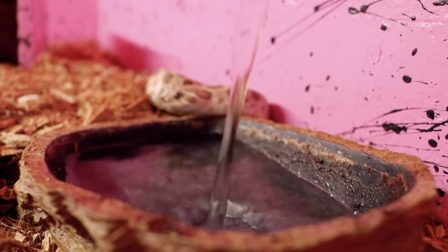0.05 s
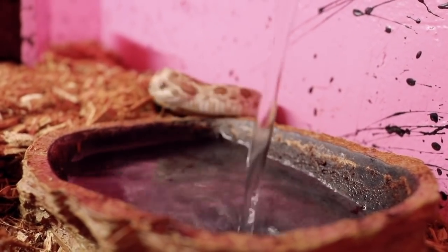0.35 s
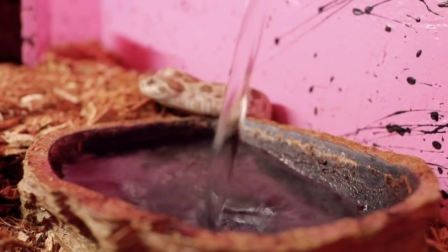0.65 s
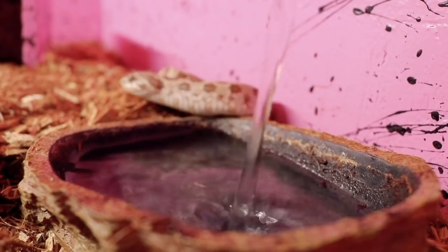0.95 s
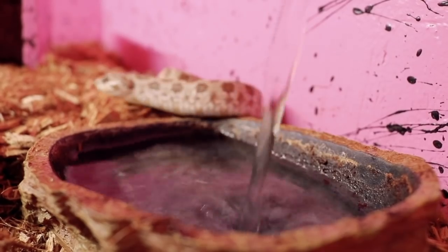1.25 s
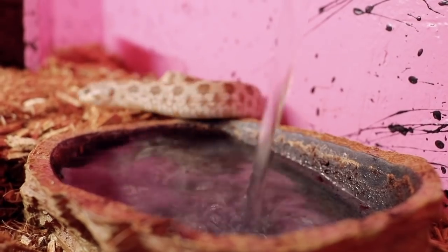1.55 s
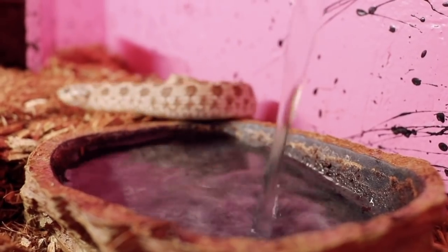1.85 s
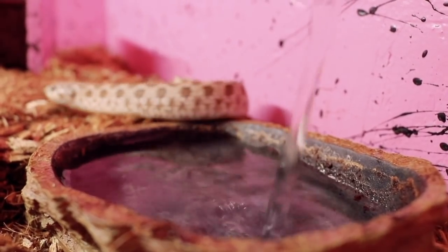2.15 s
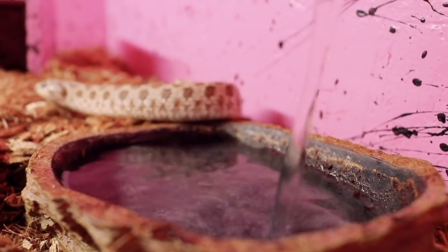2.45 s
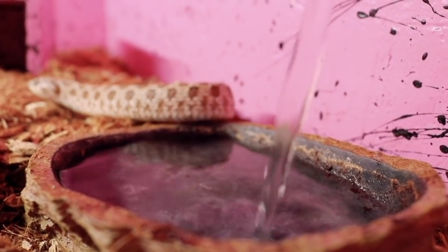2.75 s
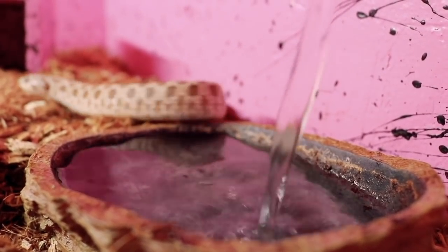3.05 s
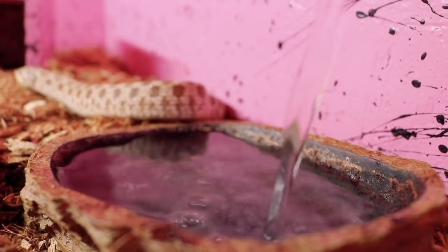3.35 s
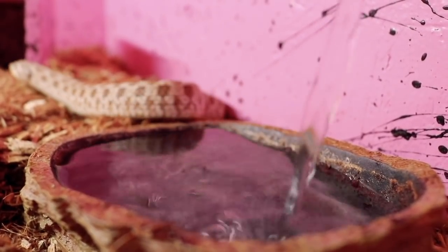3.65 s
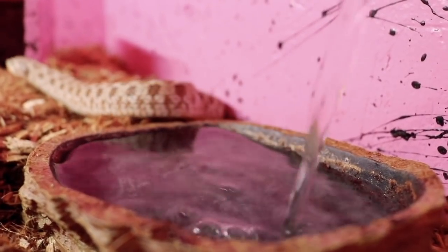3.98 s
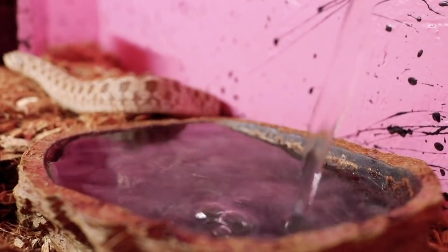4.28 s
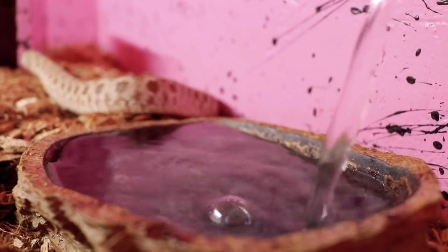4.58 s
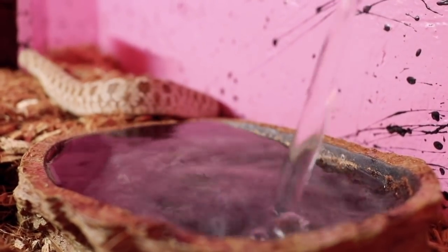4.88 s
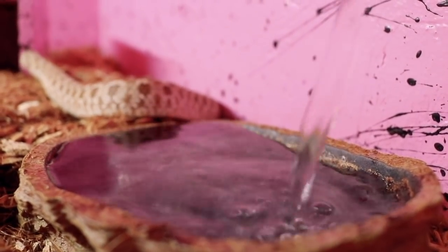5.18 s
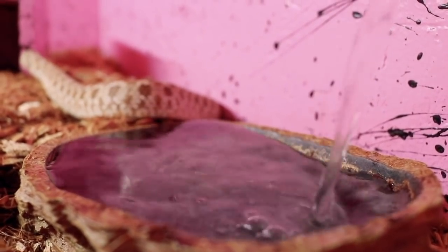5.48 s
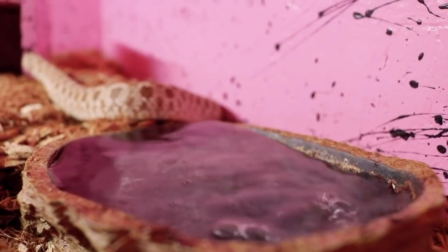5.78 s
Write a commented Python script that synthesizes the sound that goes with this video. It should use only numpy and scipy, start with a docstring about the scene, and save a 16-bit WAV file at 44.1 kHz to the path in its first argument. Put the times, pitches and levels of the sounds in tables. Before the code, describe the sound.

Water pours gently from a plastic bottle into a bowl, burbling and spattering in a quiet room, the bottle snapping once.

```python
"""A faint gurgle over the low hum of a quiet room: a thin stream of water is being poured from a
plastic bottle into a shallow bowl inside a small tank. A swarm of tiny bubbles swells with the flow,
drops slap the surface, and the bottle flexes with dull pops and one sharp snap. Pockets of trapped
air ring out as clear plinks. The near walls throw everything back within milliseconds."""
import sys
import numpy as np
from scipy import signal
from scipy.fft import rfft, irfft, next_fast_len
from scipy.io import wavfile
from scipy.ndimage import uniform_filter1d

SR = 44100
rng = np.random.default_rng(int(sys.argv[2]) if len(sys.argv) > 2 else 0)


def unload_wav(signal):
    """Save mono or channel-first audio to the path in sys.argv[1] as 16-bit WAV at rate SR, clipped to [-1, 1]."""
    wavfile.write(
        sys.argv[1],
        SR,
        np.round(np.clip(np.atleast_2d(signal).T, -1, 1) * 32767).astype(np.int16),
    )


N = 256838


def gain_of(db):
    """Decibels to a factor."""
    return 10 ** (np.asarray(db) / 20)


def unit_rms(x):
    """Scales to rms 1."""
    return x / np.sqrt(np.mean(x ** 2) + 1e-20)


def decay(t, t60, hold=1):
    """A fade that is 60 dB down at t60; a hold above 1 lingers first, then dies faster."""
    return np.exp(-np.log(1000) * (t / t60) ** hold)


def curve_at(points, hz):
    """Reads a curve on a log-frequency axis."""
    f, value = np.transpose(points)
    return np.interp(np.log(hz + 1), np.log(f + 1), value)


def stereo_pair(a, b, likeness):
    """Blends two independent noises into left and right with the given correlation."""
    return np.array([a, likeness * a + np.sqrt(1 - likeness ** 2) * b])


def place(mix, s, sound, pan_db=0):
    """Drops a sound into the mix at time s; positive pan leans left."""
    part = mix[:, max(round(s * SR), 0):][:, :len(sound)]
    part += gain_of([[pan_db / 2], [-pan_db / 2]]) * sound[:part.shape[1]]


# Colour of the room tone: f/Hz, relative level/dB
ROOM_COLOUR = [(20, -50), (40, 0.5), (62, 0.5), (120, -1), (270, 0.5), (500, -1.5), (1000, -6.5),
               (1900, -7.5), (2200, -17.5), (4000, -14.5), (7000, -15.5), (10000, -18.5), (13500, -23.5),
               (16000, -23)]
# Stereo image of the room tone: f/Hz, left-right correlation
ROOM_LIKENESS = [(40, 0.78), (120, 0.4), (500, 0.56), (2000, 0.017), (8000, 0.062)]


def room_tone(air_db=-61, hum_db=-76.5, hum_hz=89.8):
    """A bed of soft room noise with a wavering hum."""
    hz = np.fft.rfftfreq(N, 1 / SR)
    a, b, c = rfft(rng.standard_normal((3, N)))
    spectrum = stereo_pair(a, b, curve_at(ROOM_LIKENESS, hz))
    air = irfft(spectrum * gain_of(curve_at(ROOM_COLOUR, hz)), N)
    hum = irfft(c / (1 + ((hz - hum_hz) / 3) ** 2), N)  # noise a few hertz wide
    return gain_of(air_db) * unit_rms(air) + gain_of(hum_db) * unit_rms(hum)


def bubble(hz, t60, rise=0.093, attack_cycles=0.5):
    """A pocket of air swells into a ring, its pitch climbing as it nears the surface."""
    t = np.arange(int(max(t60, 0.002) * SR)) / SR
    cycles = hz * (t + rise * t ** 2 / t60 / 2)
    attack = 1 - np.exp(-cycles / attack_cycles)
    return np.sin(2 * np.pi * cycles) * attack * decay(t, t60, hold=1.43)


# Swells as the stream drags air under: t/s, large bubbles/dB, small bubbles/dB, fine spray/dB
FLOW_SWELLS = [(0, -57.5, -64.5, -93), (.17, -67, -75.5, -90), (.3, -83, -75, -90), (.65, -82, -71, -82),
               (0.869, -82, -68, -61.5), (1.11, -87, -75, -84), (1.17, -81, -58.5, -61),
               (1.31, -88, -56, -62.5), (1.355, -88, -67, -65.5), (1.45, -90, -60, -58.5),
               (1.6, -91, -51, -58), (1.74, -86, -61, -58), (1.899, -66, -55.5, -63.5),
               (2.07, -60, -58, -61.5), (2.3, -57.5, -57.5, -64), (2.62, -63, -56.5, -64),
               (2.789, -83, -64, -65), (2.91, -53, -54, -63.5), (3.0, -71, -61, -64.5),
               (3.06, -76, -54.5, -60), (3.16, -65, -57, -59.5), (3.24, -66, -57.5, -65),
               (3.37, -61, -53, -59.5), (3.53, -59.5, -61.5, -62), (3.76, -64, -58.5, -64.5),
               (4.06, -99, -75, -65), (4.22, -96, -63, -60), (4.3, -65, -64.5, -64), (4.4, -55, -55.5, -62),
               (4.55, -59, -66, -65), (4.74, -53.5, -51, -62), (4.85, -67, -65, -74),
               (4.95, -50.5, -52.5, -68), (5.2, -52, -51, -70), (5.301, -51.5, -53, -66.5),
               (5.58, -55, -55, -63), (5.72, -62, -58, -62.5), (5.82, -62, -54, -56)]
# The steady ring where the stream plunges in: t/s, level/dB
PLUNGE_SWELLS = [(0, -67.5), (.18, -68), (.3, -81), (.65, -80), (1.1, -85), (1.6, -84), (1.85, -60),
                 (2.3, -62.5), (2.6, -65.5), (2.799, -92), (3.0, -68), (3.7, -67.5), (3.85, -78),
                 (4.05, -90), (4.3, -78), (4.5, -64.5), (4.801, -73), (5.3, -67.5), (5.82, -73)]
# The dense burble of the fullest pour: t/s, level/dB
BURBLE_SWELLS = [(4.88, -90), (4.94, -60), (5.09, -61), (5.125, -65), (5.19, -55.5), (5.26, -61),
                 (5.29, -68), (5.33, -61), (5.55, -57), (5.62, -72), (5.82, -66)]


def swarm(flow, low_hz, high_hz, per_s, cycles, level_db, spread_db):
    """Many faint bubbles of one size range, with the flow riding their fader."""
    out = np.zeros((2, N))
    for when, pitch, strength, side, ring in rng.random((int(per_s * N / SR), 5)):
        hz = low_hz * (high_hz / low_hz) ** pitch
        blip = gain_of(spread_db * strength ** 2) * bubble(hz, cycles * (0.5 + ring) / hz)
        place(out, when * N / SR, blip, 10 * (side - 0.5))
    power = uniform_filter1d(uniform_filter1d((out ** 2).mean(0), SR // 16), SR // 25)
    levelled = out / np.sqrt(abs(power) + 1e-6)
    return levelled * gain_of(level_db + np.interp(np.arange(N) / SR, *flow))


def surges(depth_db=0.9, span_s=0.037):
    """The stream wobbles: a gain that swells and thins the froth at random."""
    span = int(span_s * SR)
    wobble = uniform_filter1d(uniform_filter1d(rng.standard_normal(N), span), span)
    return gain_of(depth_db * unit_rms(wobble))


def strays(flow, low_hz, high_hz, per_s, level_db, spread_db):
    """Single bubbles poke out of the swarm at random, louder as the flow swells."""
    out = np.zeros((2, N))
    for k, (when, pitch, strength, side) in enumerate(rng.random((int(per_s * N / SR), 4))):
        s = (k + when) / per_s
        hz = low_hz * (high_hz / low_hz) ** pitch
        db = np.interp(s, *flow) + level_db - spread_db * strength
        cycles = 31 * (3000 / max(hz, 1500)) ** 0.14  # large bubbles ring a few cycles more
        place(out, s, gain_of(db) * bubble(hz, cycles / hz), 10 * (side - 0.5))
    return out


# Drops slapping the water: t/s, level/dB, brightest f/Hz, width as a share of f, t60/s
DROP_SLAPS = [(0.2356, -47, 7700, 0.18, 0.0042), (0.345, -41.5, 5430, 0.21, 0.0043),
              (.437, -44, 7000, 0.33, 0.0027), (.588, -51, 7400, .1, .008),
              (0.66, -46.5, 10800, .08, 0.0076), (.6823, -37, 6000, 0.62, 0.0093),
              (0.714, -43, 7340, .12, .005), (0.8686, -34.5, 6540, 0.34, 0.0037),
              (1.0338, -44, 5670, 0.22, 0.003), (1.146, -44, 6800, 0.14, .005),
              (1.163, -45, 6570, .2, 0.0041), (1.192, -47, 8000, .4, 0.0076), (1.217, -43, 5000, .6, .009),
              (1.268, -41, 8500, .3, .014), (1.288, -39, 9000, .3, .007), (1.3044, -40, 7550, 0.5, 0.016),
              (1.321, -39, 10500, .25, .01), (1.3797, -48, 5440, .3, .008), (1.4341, -48, 4750, 0.23, .006),
              (1.441, -45, 5000, 0.54, .008), (1.4576, -42, 5800, .5, .008), (1.489, -45, 3560, .4, 0.0073),
              (1.5015, -40, 5500, 0.66, .005), (1.539, -44, 10000, .3, .005),
              (1.586, -46, 6000, .5, 0.0064), (1.614, -42, 4000, .45, .009), (1.6187, -43, 4600, .45, .007),
              (1.668, -37, 5000, 0.46, 0.007), (1.684, -44, 9500, 0.28, 0.013),
              (1.696, -40, 7500, 0.18, .005), (1.746, -41, 3050, .2, 0.0097),
              (1.7595, -39, 2900, .25, .008), (1.7605, -50, 11300, .13, 0.0069),
              (1.807, -40, 3700, .3, .01), (1.8137, -41, 5570, 0.57, .006), (1.8767, -37, 3800, .5, .005),
              (1.893, -39, 3200, .4, .007), (1.914, -39.5, 6500, 0.21, 0.0084),
              (2.0185, -31.5, 9900, 0.21, 0.0057), (2.1645, -38.5, 5000, 0.39, 0.0064),
              (2.233, -50, 6500, 0.29, .01), (2.245, -42.5, 6450, 0.19, .006),
              (2.3133, -45, 5960, 0.28, .008), (2.387, -45, 6900, .15, .006),
              (2.456, -47, 12500, .12, .005), (2.671, -47, 4880, .35, 0.0045),
              (2.78, -44, 9100, 0.43, 0.0051), (2.821, -41.5, 7000, 0.68, 0.0034),
              (2.8516, -42.5, 5050, .3, .015), (2.9655, -49, 11000, .25, .008),
              (3.0128, -44, 5500, 0.39, .004), (3.188, -39, 12850, 0.14, 0.0037),
              (3.195, -41, 12900, 0.11, 0.0056), (3.2483, -40.5, 4880, .2, .006),
              (3.5318, -41, 5400, .3, 0.0036), (3.684, -46.5, 8000, 0.4, 0.0053),
              (3.7142, -45, 8000, .45, 0.0055), (3.759, -45, 6450, .2, 0.0057),
              (3.9211, -40, 7460, .15, 0.0046), (3.979, -38, 3200, 0.28, 0.0092),
              (4.091, -42, 3500, 0.27, 0.0089), (4.3876, -28.5, 12900, 0.12, 0.0036),
              (4.388, -34.5, 4400, 0.89, .004), (4.7723, -36, 7200, 0.35, 0.0035),
              (4.778, -22, 12400, 0.13, 0.0055), (4.7785, -39, 4800, .8, 0.038),
              (4.9275, -38, 2950, 0.42, 0.0087), (4.9728, -39, 2400, .45, .007),
              (5.0678, -38, 3030, .35, .01), (5.1448, -41, 2900, .5, .007), (5.1814, -41, 2300, 0.61, .012),
              (5.2055, -38, 3000, .35, 0.0031), (5.302, -47, 3120, .4, 0.0053),
              (5.391, -42, 2480, .3, .007), (5.6367, -38, 3900, 0.13, 0.0056),
              (5.6567, -38.5, 5500, 0.94, 0.0021), (5.747, -33.5, 4800, 0.4, 0.01),
              (5.7533, -26.5, 3770, 0.14, 0.0029), (5.7543, -29.5, 10400, 0.25, 0.0076),
              (5.794, -33, 9900, 0.036, 0.011), (5.797, -35, 11500, 0.29, 0.007)]


def slaps(level_db=-1, splash_db=-20, attack_s=0.00042, soft_hz=9000):
    """A drop hits the surface: a short burst of spray around one bright tone."""
    out = np.zeros((2, N))
    t = np.arange(2048) / SR
    hz = np.fft.rfftfreq(len(t), 1 / SR)
    splash = gain_of(splash_db) * hz / (hz + 1200) / (1 + (hz / soft_hz) ** 2)
    attack = 1 - np.exp(-t / attack_s)
    for s, db, peak_hz, width, t60 in DROP_SLAPS:
        colour = np.exp(-(np.log((hz + 1) / peak_hz) / width) ** 2) + splash
        burst = irfft(rfft(rng.standard_normal(len(t))) * colour) * attack * decay(t, t60)
        place(out, s, gain_of(db + level_db) * burst / abs(burst).max())
    return out


def bumps(events, release_s, depth):
    """A gain that jumps at each event, more for loud ones, and settles back to 1."""
    kicks = np.zeros(N)
    for s, db, *_ in events:
        kicks[int(s * SR)] += gain_of(db / 2)
    envelope = signal.lfilter([1], [1, -np.exp(-1 / (release_s * SR))], kicks)
    return 1 + depth * envelope / kicks.max()


def spatter():
    """Each slap throws up fine droplets that patter back at once: a brief lift for the mist."""
    return bumps(DROP_SLAPS, release_s=0.011, depth=2.8)


# Modes of the plastic wall: f/Hz, level/dB, t60/s
WALL_MODES = [(160, -1.5, 0.016), (362, -3, 0.024), (454, -2, 0.03), (676, 1, 0.026), (864, 7.5, 0.012),
              (1167, 11, 0.012), (1430, -4.5, 0.01), (1520, -34, 0.018), (2180, 12, 0.0091),
              (2750, 11.5, 0.0076), (3520, 15.5, 0.0028), (4440, 11.5, 0.0073), (5900, 18.5, 0.0016)]
# Pops of the flexing bottle: t/s, level/dB, brightness corner/Hz, lowest tone/Hz,
# hollow level/dB, hollow f/Hz, hollow t60/s, pan/dB
BOTTLE_POPS = [(0.2632, -38.5, 520, 173, -54.5, 265.6, 0.17, 0),
               (0.2644, -47, 2600, 900, -54, 318, 0.056, 0), (.269, -43.5, 1150, 330, -51, 424, 0.07, 0),
               (.393, -63, 302, 298, -47, 260, 0.053, -2), (1.917, -41, 746, 140, -46, 176, 0.058, 5),
               (1.925, -38, 654, 169, -48.5, 243, .055, 1),
               (2.0176, -12.5, 6200, 490, -31.5, 273, 0.051, -6),
               (3.4322, -42, 494, 383, -60, 253, .055, 4), (4.31, -34, 766, 166, -62, 233, 0.043, -3),
               (4.3139, -40, 730, 265, -46, 760, 0.067, -2), (5.634, -51, 252, 133, -52, 258, 0.067, 0),
               (5.757, -52, 300, 130, -52, 217, 0.052, 0)]


def bottle_pops():
    """The thin wall snaps through, and the air inside answers with a hollow ring."""
    out = np.zeros((2, N))
    t = np.arange(SR // 5) / SR
    for s, db, corner_hz, low_hz, hollow_db, hollow_hz, hollow_t60, pan_db in BOTTLE_POPS:
        pop = np.zeros(len(t))
        for k, (hz, mode_db, t60) in enumerate(WALL_MODES):
            push = (-1) ** k / np.sqrt(1 + (hz / corner_hz) ** 6)  # neighbours swing opposite ways
            pop += push * gain_of(mode_db) * np.sin(2 * np.pi * hz * t) * decay(t, t60)
        pop = signal.lfilter(*signal.butter(3, low_hz * 0.7, "high", fs=SR), pop)
        place(out, s, gain_of(db) * pop / abs(pop).max(), pan_db)
        hollow = bubble(hollow_hz, hollow_t60, rise=0.1, attack_cycles=1.5)
        place(out, s, gain_of(hollow_db) * hollow)
    return out


def tick(noise, hz, t60=0.0033):
    """The crisp crack of the surface closing: a brief wide burst around the bubble's pitch."""
    burst = noise * decay(np.arange(len(noise)) / SR, t60)
    burst = signal.lfilter(*signal.butter(4, [0.54 * hz, 1.48 * hz], "band", fs=SR), burst)
    return burst / abs(burst).max()


# The foreground bubbles: t/s, f/Hz, level/dB, t60/s, pan/dB
CLEAR_BUBBLES = [(0.287, 5900, -47.5, 0.0066, -1), (0.3122, 4280, -46, 0.0082, -4),
                 (0.3147, 2400, -47.5, 0.016, -6), (0.437, 6080, -42, 0.0052, -1),
                 (0.7153, 7210, -44, 0.003, -7), (0.7513, 6370, -41.5, 0.0059, -9),
                 (0.8248, 3025, -42, 0.013, -7), (0.8294, 6270, -41.5, 0.006, -8),
                 (0.8364, 2670, -44, 0.0058, -11), (0.8666, 2520, -53, 0.019, -9),
                 (0.879, 3170, -42, 0.0046, -9), (0.8789, 7800, -47, 0.006, -9),
                 (0.9244, 5200, -45.5, 0.0068, 10), (0.9552, 4140, -46.0, 0.013, -2),
                 (0.9552, 6400, -46, 0.0049, -13), (1.0343, 6220, -48, 0.007, -1),
                 (1.0373, 3780, -36.5, 0.0054, -6), (1.1521, 2230, -34.5, 0.0097, -4),
                 (1.1552, 6460, -42, 0.0044, 5), (1.166, 3310, -39.5, 0.011, -12),
                 (1.1664, 2300, -41.5, 0.011, -5), (1.1719, 2060, -39, 0.015, -4),
                 (1.1719, 6300, -42, 0.004, 1), (1.222, 2290, -42, 0.012, -4),
                 (1.224, 2900, -42, 0.0078, -6), (1.2475, 2376, -37.5, 0.017, -4),
                 (1.272, 7800, -38, 0.0071, 7), (1.2712, 6680, -33, 0.0071, -4),
                 (1.281, 3110, -41.5, 0.015, -7), (1.3063, 5710, -42.5, 0.0037, 11),
                 (1.32, 3280, -44, 0.011, -8), (1.3971, 1960, -44, 0.018, -5),
                 (1.4158, 2300, -39.5, 0.016, -3), (1.4162, 3200, -37, 0.0043, -6),
                 (1.4172, 1980, -41, 0.02, -5), (1.458, 4540, -44, 0.008, -1),
                 (1.5004, 2380, -37.5, 0.0061, -5), (1.502, 5470, -51, 0.003, -4),
                 (1.535, 2430, -35.5, 0.0085, -4), (1.5476, 2980, -40.5, 0.009, -9),
                 (1.5712, 3420, -38.5, 0.0056, -9), (1.5708, 1915, -43.5, 0.037, -6),
                 (1.587, 6500, -35, 0.0022, -1), (1.599, 4780, -35, 0.0035, 3),
                 (1.6177, 5070, -41.5, 0.01, 5), (1.658, 6720, -44, 0.0081, -9),
                 (1.6688, 3610, -40, 0.0035, -9), (1.669, 4300, -32.5, 0.005, -3),
                 (1.67, 1800, -44, 0.011, -8), (1.67, 5450, -42, 0.009, 15),
                 (1.7054, 3560, -38.5, 0.0057, -5), (1.768, 4400, -40, 0.0091, -1),
                 (1.776, 7100, -38.5, 0.0094, -3), (1.779, 5900, -53, 0.006, 3),
                 (1.8141, 5640, -45, 0.005, 10), (1.8145, 2970, -38, 0.0079, -6),
                 (1.844, 8000, -37, 0.006, -7), (1.854, 7800, -34.5, 0.0074, -2),
                 (1.8676, 5640, -40, 0.0066, 8), (1.8761, 1847, -42.5, 0.027, -5),
                 (1.8761, 3000, -34.5, 0.0046, -5), (1.887, 3360, -39, 0.0067, -4),
                 (1.888, 1860, -45, 0.013, 1), (1.9232, 3030, -32.5, 0.005, -4),
                 (1.9244, 2460, -35, 0.0054, -4), (1.928, 1670, -43, 0.035, -3),
                 (1.9708, 3420, -40, 0.011, -7), (1.975, 1860, -41, 0.015, -5),
                 (2.0638, 1200, -41.5, 0.01, 9), (2.0775, 1680, -40, 0.018, 2),
                 (2.166, 5200, -36, 0.0028, 8), (2.181, 4010, -41.5, 0.011, -1),
                 (2.3566, 2660, -32, 0.0066, -2), (2.357, 1955, -37.0, 0.02, -5),
                 (2.4, 5180, -37, 0.0091, 2), (2.449, 3610, -38.5, 0.01, -2),
                 (2.4488, 2860, -35.5, 0.013, -2), (2.622, 2390, -43, 0.016, 0),
                 (2.621, 4700, -43, 0.012, -6), (2.642, 3150, -41.5, 0.012, -7),
                 (2.671, 3160, -33.5, 0.0039, -3), (2.671, 4860, -38.5, 0.004, 7),
                 (2.6913, 2370, -41.5, 0.013, -4), (2.701, 2900, -34.5, 0.0075, -4),
                 (2.7129, 1846, -40, 0.026, -4), (2.714, 4330, -40, 0.0033, 5),
                 (2.716, 6600, -42.5, 0.0052, -13), (2.7155, 3480, -27, 0.016, -3),
                 (2.732, 3300, -46, 0.008, -2), (2.8025, 3940, -39.5, 0.018, 4),
                 (2.8037, 3270, -40.5, 0.013, -9), (2.8202, 2890, -26.5, 0.0089, -4.5),
                 (2.8601, 950, -49.5, 0.067, -1), (2.8766, 4530, -43, 0.0073, 1),
                 (2.8959, 1080, -44.5, 0.023, -7), (2.8977, 2450, -45, 0.028, -8),
                 (2.908, 1386, -36, 0.023, -5), (2.9096, 2630, -32, 0.01, -6),
                 (2.9137, 1164, -54, 0.02, -4), (2.934, 1625, -40.5, 0.034, -6),
                 (2.935, 2300, -43, 0.018, -7), (2.948, 2500, -33, 0.0056, -9),
                 (2.9512, 3070, -35.5, 0.01, -8), (2.9609, 2570, -40, 0.013, -3),
                 (2.963, 1700, -39.5, 0.026, -8), (2.9683, 3800, -37, 0.01, -3),
                 (2.9693, 2100, -36, 0.007, -3), (2.981, 2790, -38.5, 0.019, -3),
                 (2.9805, 3370, -37, 0.004, -8), (2.9818, 1570, -42, 0.018, -7),
                 (2.991, 1380, -46.5, 0.03, -4), (2.991, 2020, -33.5, 0.007, -3),
                 (3.013, 4270, -37, 0.003, -6), (3.0127, 1360, -43, 0.025, -2),
                 (3.022, 3130, -40, 0.012, -9), (3.023, 1700, -39, 0.013, -3),
                 (3.027, 4670, -40, 0.0058, 2), (3.1008, 2380, -42, 0.011, -4),
                 (3.1007, 4460, -41.5, 0.0098, 4), (3.101, 1734, -42.5, 0.044, -3),
                 (3.1219, 2126, -39, 0.026, -6), (3.1217, 3830, -33.5, 0.0048, 1),
                 (3.122, 4900, -40, 0.003, -5), (3.1357, 3670, -41, 0.007, -9),
                 (3.1476, 2450, -40, 0.017, -4), (3.1618, 1820, -41, 0.019, -5),
                 (3.162, 2970, -31.5, 0.0062, -6), (3.1892, 1520, -28.5, 0.0072, -3.5),
                 (3.1915, 2480, -45.5, 0.025, -5), (3.2695, 2340, -37.5, 0.014, -2),
                 (3.2946, 3480, -30.5, 0.003, -5), (3.3038, 1860, -39.5, 0.0072, -4),
                 (3.3388, 2430, -35, 0.015, -9), (3.342, 1780, -35, 0.007, -6),
                 (3.423, 5150, -40.5, 0.005, 5), (3.4983, 3010, -33.5, 0.0076, -5),
                 (3.4998, 1710, -37.5, 0.019, -1), (3.5316, 5080, -34, 0.0059, -1),
                 (3.69, 5100, -45.5, 0.007, 10), (3.7021, 1680, -43.5, 0.024, 0),
                 (3.8143, 2400, -46.5, 0.013, 0), (3.831, 3550, -42, 0.0098, -2),
                 (3.8327, 1805, -43.5, 0.018, -5), (3.919, 3580, -30, 0.0055, -2),
                 (3.921, 2820, -36.5, 0.009, -5), (3.921, 7200, -36, 0.005, -8),
                 (3.949, 2980, -39, 0.0046, -6), (3.9509, 2590, -38, 0.0026, -6),
                 (3.9784, 2106, -35.5, 0.02, -4), (3.9819, 3700, -31.5, 0.002, -2),
                 (4.0915, 3800, -35, 0.012, -4), (4.092, 2780, -33.5, 0.0053, -3),
                 (4.151, 5100, -40.5, 0.0058, 1), (4.1972, 3280, -38.5, 0.0083, -5),
                 (4.35, 2445, -48.5, 0.024, -9), (4.3726, 2390, -48, 0.011, -11),
                 (4.3897, 4070, -35.5, 0.0031, -7), (4.3906, 1380, -39.5, 0.016, 2),
                 (4.4156, 6050, -54, 0.006, 3), (4.4483, 1810, -39.5, 0.014, 2),
                 (4.4532, 3080, -31, 0.0018, -5), (4.6684, 2600, -39.5, 0.029, -3),
                 (4.697, 5340, -36, 0.0022, 2), (4.7, 1405, -46.5, 0.041, 2), (4.7027, 2980, -33, 0.004, 2),
                 (4.745, 5460, -33, 0.0011, -1), (4.7457, 6760, -25, 0.0056, -2),
                 (4.746, 7400, -30, 0.0043, -6), (4.7494, 1350, -43, 0.022, 2),
                 (4.7566, 3030, -46, 0.0045, -3), (4.758, 4970, -47, 0.0057, -10),
                 (4.771, 6700, -25, 0.0015, 4), (4.777, 3160, -37.5, 0.006, -4),
                 (4.871, 3870, -30.5, 0.006, 0), (4.8802, 2170, -34.5, 0.009, -3),
                 (4.928, 3570, -42, 0.0055, -5), (4.9469, 3370, -34, 0.0044, -3),
                 (4.9717, 2140, -42, 0.011, -3), (4.9886, 3370, -35, 0.0085, -2),
                 (4.999, 1040, -45, 0.025, -9), (4.999, 3700, -36, 0.0055, -2),
                 (5.0174, 3430, -37, 0.005, -3), (5.0173, 4130, -39, 0.009, 3),
                 (5.032, 953, -45, 0.023, -7), (5.0403, 3600, -41, 0.015, -7),
                 (5.0526, 4910, -39, 0.009, 6), (5.0687, 3400, -38, 0.0083, -3),
                 (5.069, 1040, -41.5, 0.012, -4), (5.087, 4140, -32.5, 0.015, 0),
                 (5.1048, 3500, -32, 0.0051, -6), (5.109, 5630, -50, 0.009, 2),
                 (5.1343, 1060, -43, 0.016, -5), (5.151, 2100, -40, 0.011, -5),
                 (5.155, 3220, -35.5, 0.007, -4), (5.1646, 2940, -35.5, 0.009, -5),
                 (5.167, 5540, -43, 0.0069, -1), (5.179, 1726, -38.5, 0.025, -5),
                 (5.181, 2400, -41, 0.021, -2), (5.184, 2830, -39, 0.017, -4),
                 (5.185, 3830, -35, 0.0056, -1), (5.2032, 2330, -27.5, 0.011, -4),
                 (5.2055, 3680, -30, 0.013, -5), (5.207, 4180, -34, 0.015, -4),
                 (5.2076, 2050, -38, 0.01, -5), (5.215, 2800, -44, 0.016, -3),
                 (5.2167, 2420, -39, 0.006, -4), (5.2258, 2450, -47, 0.02, -3),
                 (5.2377, 950, -46.5, 0.014, -9), (5.237, 5500, -44, 0.0033, 3),
                 (5.2386, 2550, -32, 0.005, -5), (5.2425, 3050, -41, 0.014, -5),
                 (5.2603, 4930, -32.5, 0.011, 3), (5.2707, 2030, -36.5, 0.007, -5),
                 (5.3158, 3420, -33.5, 0.017, -3), (5.3207, 1990, -34.5, 0.0063, -6),
                 (5.3551, 2370, -40, 0.015, -3), (5.3554, 3100, -41, 0.01, -5),
                 (5.4463, 2430, -44, 0.014, -2), (5.4577, 3040, -35, 0.0085, -2),
                 (5.4798, 3070, -35.5, 0.014, -4), (5.4803, 2340, -36, 0.0086, -4),
                 (5.499, 3240, -40, 0.0065, -3), (5.5213, 2327, -36.0, 0.016, -4),
                 (5.5308, 1696, -43, 0.04, -2), (5.5942, 3160, -38, 0.0062, -5),
                 (5.6353, 6960, -37.5, 0.004, -6), (5.6367, 3720, -34.5, 0.0059, -5),
                 (5.641, 5900, -53, 0.006, -6), (5.6556, 1030, -37.5, 0.0091, -6),
                 (5.656, 1400, -43, 0.018, -2), (5.6552, 6270, -36, 0.0012, -1),
                 (5.6555, 7500, -34, 0.0022, -2), (5.666, 2830, -44, 0.016, -3),
                 (5.668, 2340, -41.5, 0.024, -3), (5.6915, 1000, -46.5, 0.027, -1),
                 (5.6923, 2990, -37, 0.013, -4), (5.7336, 1870, -41, 0.014, -5),
                 (5.7452, 4070, -38.5, 0.013, -6), (5.7517, 910, -34.5, 0.014, -7),
                 (5.7533, 4120, -32, 0.0034, 5), (5.7548, 788, -41, 0.0089, 0),
                 (5.756, 2906, -32.5, 0.016, -3), (5.7608, 835, -31, 0.016, -1),
                 (5.7715, 775, -37.5, 0.022, -4), (5.7838, 2210, -45, 0.013, -5),
                 (5.7971, 2354, -28.5, 0.013, -4.5), (5.7928, 793, -35.5, 0.024, -2),
                 (5.809, 980, -43, 0.02, -4)]


def plinks(level_db=-0.64, tick_db=-9, shard_db=-12, shard_delay_s=0.0045, shard_spread=0.448):
    """A bubble pinches off with a tick, rings upward in pitch and sheds a weaker one just after."""
    out = np.zeros((2, N))
    draws = rng.random((len(CLEAR_BUBBLES), 3))
    noises = rng.standard_normal((len(CLEAR_BUBBLES), 400))
    for (s, hz, db, t60, pan_db), (climb, late, detune), noise in zip(CLEAR_BUBBLES, draws, noises):
        gain = gain_of(db + level_db)
        ring = bubble(hz, t60, rise=0.096 * (0.5 + climb), attack_cycles=1.1)
        shard = bubble(hz * (1 + shard_spread * (detune - 0.5)), t60, attack_cycles=1.1)
        place(out, s, gain * ring, pan_db)
        place(out, s, gain * gain_of(tick_db) * tick(noise, hz), pan_db)
        place(out, s + shard_delay_s * (0.5 + late), gain * gain_of(shard_db) * shard, pan_db)
    return out


def spurts(span_s=0.12):
    """Every clear bubble churns the surface: a gain that bunches the swarm just after it."""
    churn = bumps(CLEAR_BUBBLES, release_s=0.0037, depth=2.7)
    return churn / uniform_filter1d(churn, int(span_s * SR))


# Hollow resonances of the bowl and the tank around it: f/Hz, width/Hz, level/dB
BOWL_MODES = [(1390, 44, -7.5), (1680, 94, -17), (2040, 30, -16), (2404, 57, -16), (3040, 47, -16),
              (3023, 140, -8.5), (3605, 54, -3.5), (3940, 42, -13), (4070, 27, -9)]


def bowl(x):
    """The air above the water rings at a few pitches."""
    return x + sum(gain_of(db) * signal.lfilter(*signal.iirpeak(hz, hz / width, fs=SR), x)
                   for hz, width, db in BOWL_MODES)


def delayed(x, left_s, right_s):
    """Delays each channel by its own travel time."""
    hz = np.fft.rfftfreq(next_fast_len(N + SR // 10), 1 / SR)
    shift = np.exp(-2j * np.pi * hz * np.array([[left_s], [right_s]]))
    return irfft(rfft(x, 2 * (len(hz) - 1)) * shift)[:, :N]


def tail(x, t60s, likeness, predelay_s):
    """Diffuse reflections, each band dying at its own speed."""
    noise = stereo_pair(*rng.standard_normal((2, SR // 2)), likeness)
    hz, t, bands = signal.stft(noise, SR, nperseg=128)
    _, response = signal.istft(bands * decay(t, curve_at(t60s, hz)[:, None]), SR, nperseg=128)
    response /= np.linalg.norm(response[0])
    response = np.pad(response, ((0, 0), (int(predelay_s * SR), 0)))
    return signal.fftconvolve(x, response, axes=1)[:, :N]


# Early reflections off the tank walls: left delay/s, right delay/s, relative gain
WALL_ECHOES = [(.00075, 0.00048, -0.012), (.0014, 0.0023, -0.56), (.0026, 0.0012, -0.12),
               (.0036, 0.0038, -0.072), (.0052, .0051, .27), (.0067, .0069, -0.23), (.0084, 0.0067, 0.21)]
# Reverb of the room beyond: f/Hz, t60/s
ROOM_DECAY = [(200, 0.37), (1000, 0.17), (4000, 0.18), (14000, 0.12)]


def tank(x, left_lag_s, walls_db, flutter_db, room_db):
    """Direct sound, single wall echoes, a quick flutter inside the tank and the room beyond."""
    direct = delayed(x, left_lag_s, 0)
    echoes = sum(gain * delayed(x, left_s, right_s) for left_s, right_s, gain in WALL_ECHOES)
    flutter = tail(x, [(500, 0.074), (8000, 0.026)], likeness=0.36, predelay_s=0.0018)
    room = tail(x, ROOM_DECAY, likeness=0.051, predelay_s=0.01)
    return direct + gain_of(walls_db) * echoes + gain_of(flutter_db) * flutter + gain_of(room_db) * room


def scene():
    """The stream lands right of centre, so the left side hears it later and softer."""
    s, large_db, small_db, fine_db = np.transpose(FLOW_SWELLS)
    large, small, fine = (s, large_db), (s, small_db), (s, fine_db)
    plunging, fullest = np.transpose(PLUNGE_SWELLS), np.transpose(BURBLE_SWELLS)
    gurgle = swarm(large, 932, 1706, per_s=220, cycles=21, level_db=-12.5, spread_db=20)
    plunge = swarm(plunging, 1677, 1929, per_s=600, cycles=124, level_db=-1.2, spread_db=26)
    trickle = swarm(small, 2037, 4440, per_s=1000, cycles=23, level_db=-6, spread_db=25.5)
    patter = swarm(small, 1880, 4480, per_s=450, cycles=14, level_db=-8.5, spread_db=24)
    burble = swarm(fullest, 1890, 4200, per_s=700, cycles=19, level_db=-3, spread_db=16)
    spray = swarm(fine, 4480, 8450, per_s=700, cycles=21, level_db=-5, spread_db=23)
    mist = swarm(fine, 6450, 13540, per_s=1300, cycles=10.6, level_db=-7, spread_db=36)
    churned = spurts() * (gurgle + trickle + patter + burble + spray)
    froth = surges() * (churned + spatter() * mist + plunge)
    blips = strays(small, 1950, 4160, per_s=12, level_db=5.5, spread_db=21)
    pips = strays(fine, 4360, 7100, per_s=14, level_db=1.5, spread_db=7)
    water = bowl(plinks() + (blips + pips + froth) * gain_of([[-1.4], [1.3]]))
    splashes = slaps() * gain_of([[-1.8], [1.4]])
    return (tank(water, left_lag_s=0.000048, walls_db=-16, flutter_db=-5.5, room_db=-11.5)
            + tank(splashes, left_lag_s=0.00002, walls_db=-12.5, flutter_db=-10, room_db=-13)
            + tank(bowl(bottle_pops()), left_lag_s=0.0002, walls_db=-25, flutter_db=-13, room_db=-15.5)
            + room_tone())


def record(dry, soft_hz=15000, edge_hz=16000):
    """The microphone softens the very top, and a steep high cut ends the band."""
    softened = signal.sosfilt(signal.butter(5, soft_hz, fs=SR, output="sos"), dry)
    high_cut = signal.firwin(511, edge_hz, window=("kaiser", 9), fs=SR)
    return signal.oaconvolve(softened, high_cut[None], "same")


dry = scene()
out = record(dry)
unload_wav(out)
```